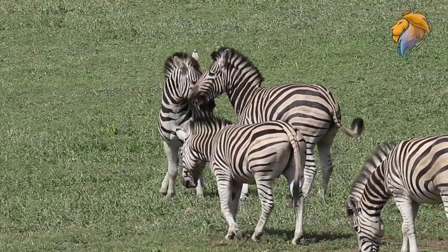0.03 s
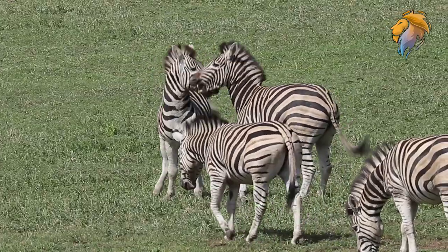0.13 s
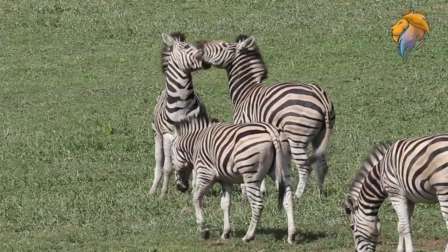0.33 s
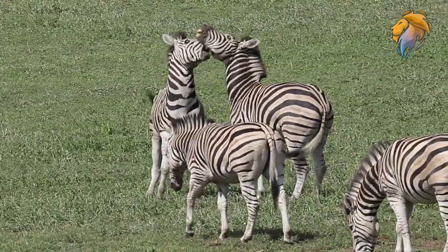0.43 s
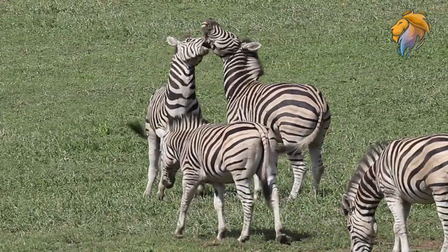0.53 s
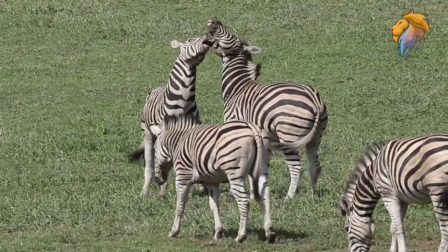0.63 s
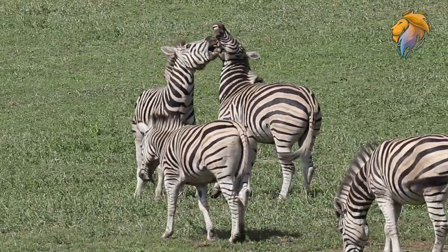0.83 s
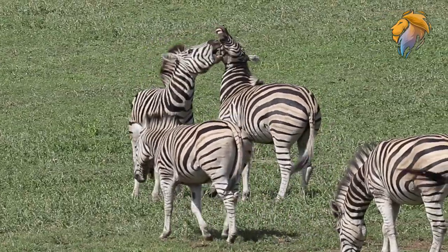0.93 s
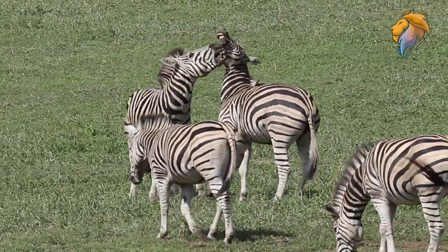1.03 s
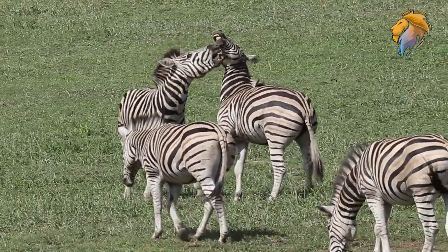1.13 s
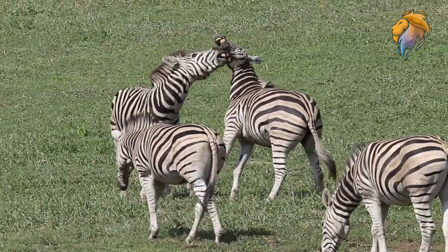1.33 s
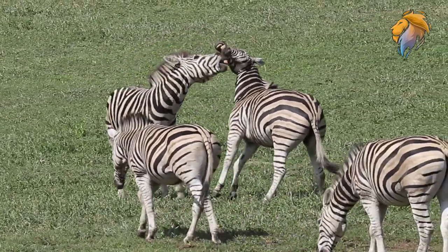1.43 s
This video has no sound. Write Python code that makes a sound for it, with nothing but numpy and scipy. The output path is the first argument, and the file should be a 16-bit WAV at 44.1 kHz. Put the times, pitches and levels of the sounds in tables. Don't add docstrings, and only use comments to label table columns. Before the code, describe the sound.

Fast, squeaky zebra yelps in front echo over open grassland; fainter hoarse barks on the left fall between them, while distant small birds chirp, grass hisses softly and low wind rumbles in the stereo microphone.

```python
import sys
import numpy as np
from scipy import signal
from scipy.fft import rfft, irfft
from scipy.io import wavfile
from scipy.ndimage import uniform_filter1d

SR = 44100
rng = np.random.default_rng(int(sys.argv[2]) if len(sys.argv) > 2 else 0)


def to_linear_factor(level_db):
    exponent = np.asarray(level_db, float) / 20
    return 10 ** exponent


def log_audio(samples):
    frames = np.atleast_2d(samples).T
    limited = np.clip(frames, -1, 1)
    pcm = np.round(limited * 32767).astype(np.int16)
    wavfile.write(sys.argv[1], SR, pcm)


N = 66150
LEAD_IN = SR // 5


def unit(x):
    return x / np.sqrt(np.mean(x ** 2))


def walk(rate_hz, size):
    k = int(SR / rate_hz)
    return unit(uniform_filter1d(uniform_filter1d(rng.standard_normal(size), k), k))


def shape(u, length, attack, release):
    rise = np.clip(u / attack, 0, 1)
    fall = np.clip((length - u) / release, 0, 1)
    return np.sin(np.pi / 2 * rise * fall) ** 2


def resonate(x, hz, width_hz):
    b, a = signal.iirpeak(hz, hz / width_hz, SR)
    return signal.lfilter(b, a, signal.lfilter(b, a, x))


def throat_noise(size, cavities):
    breath = rng.standard_normal(size)
    return unit(sum(to_linear_factor(db) * resonate(breath, hz, width_hz) for hz, width_hz, db in cavities))


def scatter(x, parts, shared):
    u = np.arange(SR) / SR
    response = 0
    for db, t60_s in parts:
        noise = rng.standard_normal((3, SR))
        h = shared * noise[0] + (1 - shared) * noise[1:]
        h = h * to_linear_factor(-60 * u / t60_s) * np.clip(u / 0.0035, 0, 1)
        response = response + to_linear_factor(db) * h / np.sqrt(np.sum(h ** 2, 1, keepdims=True))
    return signal.fftconvolve(x[None], response)[:, :len(x)]


def late(x, lag_s):
    f = np.fft.rfftfreq(len(x), 1 / SR)
    return irfft(rfft(x) * np.exp(-2j * np.pi * f * lag_s), len(x))


def phase_of(hz, shake):
    return 2 * np.pi * np.cumsum(hz * shake) / SR


def first_notes(t, shake):
    # t/s, length/s, first f/Hz, last f/Hz, level/dB
    pips = [
        (0.137, 0.023, 1399, 1380, -26.5),
        (0.529, 0.04, 1460, 1407, -20),
        (0.929, 0.035, 1644, 1586, -20),
    ]
    out = 0
    for start, length, f0, f1, db in pips:
        u = np.clip(t - start, 0, length)
        hz = f0 + (f1 - f0) * u / length + 199 * np.exp(-u / 0.0046)
        gain = to_linear_factor(db) * shape(u, length, 0.49 * length, 0.12 * length)
        out = out + gain * np.sin(phase_of(hz, shake))
    return out


def glide(t, contour, shake):
    times, hz, db = np.array(contour).T
    length = times[-1] - times[0]
    u = np.clip(t - times[0], 0, length)
    gain = uniform_filter1d(to_linear_factor(np.interp(t, times, db)), size=90) * shape(u, length, 0.003, 0.0048)
    return gain, phase_of(np.interp(t, times, hz), shake), u / length


def hooked_notes(t, shake):
    # t/s, f/Hz, level/dB
    hooks = [
        [(0.185, 1660, -41), (0.189, 1613, -30), (0.197, 1415, -21), (0.211, 1438, -21), (0.219, 1361, -26),
         (0.228, 1340, -44)],
        [(0.584, 1678, -35.5), (0.594, 1589, -21), (0.604, 1559, -16.5), (0.614, 1478, -28.5),
         (0.626, 1420, -23.5), (0.637, 1374, -32.5)],
        [(0.978, 1880, -39), (0.984, 1808, -25.5), (0.998, 1600, -27), (1.008, 1566, -13), (1.014, 1530, -30.5),
         (1.032, 1486, -30)],
    ]
    out = 0
    for contour in hooks:
        gain, phase, _ = glide(t, contour, shake)
        out = out + gain * np.sin(phase)
    return out


def rising_whistles(t, shake):
    # t/s, f/Hz, level/dB
    rises = [
        [(-.1, 2026, -36), (-.07, 2200, -20.5), (-.035, 2350, -22.5), (-.015, 2394, -40)],
        [(.299, 2080, -41.5), (.304, 1992, -29), (.318, 2073, -29), (.332, 2188, -17), (.352, 2283, -18.5),
         (.366, 2352, -14.5), (.384, 2450, -53)],
        [(.686, 2203, -40), (.694, 2110, -17.5), (.705, 2186, -16), (.72, 2302, -14.5), (.742, 2399, -8.5),
         (.76, 2485, -25.5), (.775, 2452, -41.5)],
        [(1.076, 2150, -53.5), (1.083, 2150, -16.5), (1.095, 2185, -11), (1.115, 2301, -12.5),
         (1.136, 2377, -13), (1.148, 2503, -16.5), (1.16, 2420, -39)],
    ]
    # multiple of f, level/dB, growth over the rise/dB
    partials = [(2, -42.5, 8.5), (3, -33.5, 18.5), (4, -49, 4.5)]
    whistles, overtones = 0, 0
    for contour in rises:
        gain, phase, progress = glide(t, contour, shake)
        whistles = whistles + gain * np.sin(phase)
        for multiple, db, growth_db in partials:
            level = to_linear_factor(db + growth_db * (progress - 0.5))
            overtones = overtones + gain * level * np.sin(round(multiple) * phase)
    return whistles, overtones


def yelps(t, shake):
    # t/s, length/s, knee f/Hz, last f/Hz, level/dB
    plunges = [
        (-.009, 0.041, 2039, 1320, -21.5),
        (0.389, 0.042, 2077, 1196, -21.5),
        (.775, .052, 2350, 1396, -16.5),
        (1.167, 0.049, 2328, 1400, -19),
    ]
    snaps_hz = [1897, 1930, 1007, 1100]
    out = 0
    for (start, length, f0, f1, db), snap_hz in zip(plunges, snaps_hz):
        u = np.clip(t - start, 0, length)
        hz = f0 + (f1 - f0) * u / length + snap_hz * np.exp(-u / 0.0034)
        thin_db = -4.5 / (1 + np.exp((2350 - hz) / 60))
        sag_db = -15 * u / length
        gain = to_linear_factor(db + thin_db + sag_db) * shape(u, length, 0.0061, 0.0076)
        out = out + gain * np.sin(phase_of(hz, shake))
    return out


def whistler(t):
    shake = 1 + 0.0032 * walk(150, len(t))
    wobble = to_linear_factor(2.5 * walk(70, len(t)))
    rough = to_linear_factor(4.5 * walk(300, len(t)))
    whistles, overtones = rising_whistles(t, shake)
    notes = first_notes(t, shake) + hooked_notes(t, shake) + whistles
    return np.sqrt(2) * np.array([notes * wobble, yelps(t, shake) * rough, overtones * rough])


def call_in_field(t):
    # delay t/s, left level/dB, right level/dB
    reflections = [
        (.011, -11.5, -18.5),
        (.024, -38, -18),
    ]
    notes, drops, overtones = whistler(t)
    tone = notes + drops
    overtone_pan_db, right_lead_s = 5.5, 3e-5
    left = to_linear_factor(0.7) * tone + to_linear_factor(overtone_pan_db / 2) * overtones
    right = late(tone + to_linear_factor(-overtone_pan_db / 2) * overtones, -right_lead_s)
    call = np.array([left, right])
    for lag_s, left_db, right_db in reflections:
        call = call + np.roll(tone + overtones, int(lag_s * SR)) * to_linear_factor(np.array([[left_db], [right_db]]))
    thrown = notes + to_linear_factor(6) * drops + to_linear_factor(9.5) * overtones
    shimmer = walk(110, len(t))
    return call + scatter(thrown * shimmer, [(-11.5, 0.25), (-20.5, 0.79)], 0.5)


def barker(t):
    # t/s, level/dB
    barks = [
        (.184, -34),
        (.665, -34),
        (1.142, -33.5),
    ]
    # f/Hz, width/Hz, level/dB
    throat_cavities = [(730, 69, 0), (911, 59, 6.5), (1013.4, 100, 3.5)]
    rasp_cavities = [(1400, 380, 1), (1720, 450, 2), (2350, 386, 1.5), (3350, 320, -9.5)]
    length, grunt_lead, grunt_length = 0.13, 0.036, 0.045
    hoarse = throat_noise(len(t), throat_cavities)
    upper = throat_noise(len(t), rasp_cavities)
    voice, rasp = 0, 0
    for start, db in barks:
        u = np.clip(t - start, 0, length)
        phase = 2 * np.pi * (453 * u - 520 * u ** 2 / 2 - 2820 * u ** 3 / 3)
        clear = shape(u, length, 0.045, 0.085) * np.sin(2 * phase)
        clear = clear + to_linear_factor(-19.5) * shape(u, length, 0.028, 0.032) * np.sin(phase)
        clear = 1.3 * to_linear_factor(2.2 * walk(90, len(t))) * clear
        burst = shape(u, length, 0.003, 0.047) * to_linear_factor(-9 * u / length) * hoarse
        v = np.clip(t - start + grunt_lead, 0, grunt_length)
        grunt_phase = 2 * np.pi * (651.8 * v + 102 * v ** 2 / 0.06)
        grunt = shape(v, grunt_length, 0.0081, 0.015) * np.sin(grunt_phase)
        voice = voice + to_linear_factor(db) * (clear + to_linear_factor(-1.5) * burst + to_linear_factor(-15.5) * grunt)
        flutter = 1 + 0.46 * np.sin(phase)
        rasp = rasp + to_linear_factor(db - 3) * shape(u, length, 0.0047, 0.066) * flutter * upper
    return voice, rasp


def bark_in_field(t):
    voice, rasp = barker(t)
    left = 3.02 * voice + 1.1 * rasp
    right = -2.5 * to_linear_factor(-17) * voice + 0.47 * to_linear_factor(-12) * np.roll(rasp, 9)
    return np.array([left, right]) + scatter(voice + rasp, [(-6, 0.5)], 0.3)


def small_birds(t):
    # t/s, length/s, first f/Hz, last f/Hz, level/dB
    chirps = [(-.005, 0.05, 3950, 4600, -55), (.035, 0.023, 4500, 4264, -59),
              (0.079, 0.011, 4400, 3220, -55.5), (0.098, 0.013, 5000, 4060, -56.5),
              (0.396, 0.016, 6500, 5140, -51.5), (0.417, 0.012, 5600, 3810, -43.5),
              (0.436, .01, 5400, 4030, -48), (0.473, 0.014, 4500, 3520, -55),
              (0.514, 0.017, 5000, 3560, -55.5), (.6, 0.033, 4300, 4430, -67.5),
              (1.091, 0.0083, 6200, 3460, -58), (1.099, .01, 5200, 3060, -39),
              (1.22, 0.041, 4600, 3210, -48.5), (1.257, .012, 5600, 3200, -49.5)]
    buzz = unit(resonate(rng.standard_normal(len(t)), 5000, 600))
    birds = to_linear_factor(-56) * np.exp(-((t - 1.098) / 0.057) ** 2) * buzz
    for start, length, f0, f1, db in chirps:
        u = np.clip(t - start, 0, length)
        phase = 2 * np.pi * (f0 * u + (f1 - f0) * u ** 2 / (2 * length))
        birds = birds + to_linear_factor(db) * shape(u, length, 0.55 * length, 0.34 * length) * np.sin(phase)
    birds = birds * to_linear_factor(1.5 * walk(540, len(t)))
    return birds * to_linear_factor(np.array([[1.5], [-1.5]])) + scatter(birds, [(-0.5, 0.2)], 0.3)


def coloured(points):
    f = np.fft.rfftfreq(N, 1 / SR) + 1e-3
    hz, db = np.array(points).T
    return unit(irfft(rfft(rng.standard_normal(N)) * to_linear_factor(np.interp(np.log(f), np.log(hz), db)), N))


def wind(t):
    # f/Hz, level/dB per Hz
    rumble = [(2.4, -48), (4.0, 6.5), (20, -2.5), (88, -18.5), (156, -27.5), (200, -29), (260, -56),
              (440, -120)]
    # t/s, level/dB
    swells = [
        (0.0, -40),
        (0.278, -35.5),
        (0.434, -43),
        (0.5, -35),
        (1.132, -37),
        (1.324, -38.5),
        (1.5, -37),
    ]
    times, db = np.array(swells).T
    gust_db = np.interp(t, times, db - db.mean())
    ports = [coloured(rumble) * to_linear_factor(-35.5 + side_db + gust_db + 0.5 * walk(2.1, N)) for side_db in (0.8, -0.8)]
    return np.array(ports)


def grass(t):
    # f/Hz, level/dB per Hz
    hiss = [(130, -22), (180, -4), (350, -5.5), (720, -10.5), (980, -3.5), (1200, -15.5), (2400, -15.5),
            (3500, -20.5), (6000, -30), (16000, -32.5)]
    common = coloured(hiss)
    return np.array([(0.37 * common + coloured(hiss)) * to_linear_factor(-51.5 + 2.4 * walk(2.6, N)) for _ in range(2)])


def scene():
    t = (np.arange(N + LEAD_IN) - LEAD_IN) / SR
    animals = call_in_field(t) + bark_in_field(t) + small_birds(t)
    t = t[LEAD_IN:]
    return animals[:, LEAD_IN:] + wind(t) + grass(t)


def top_cut(x):
    return signal.sosfilt(signal.butter(12, 16360, fs=SR, output="sos"), x)


def record(dry):
    return top_cut(dry)


dry = scene()
out = record(dry)
log_audio(out)
```